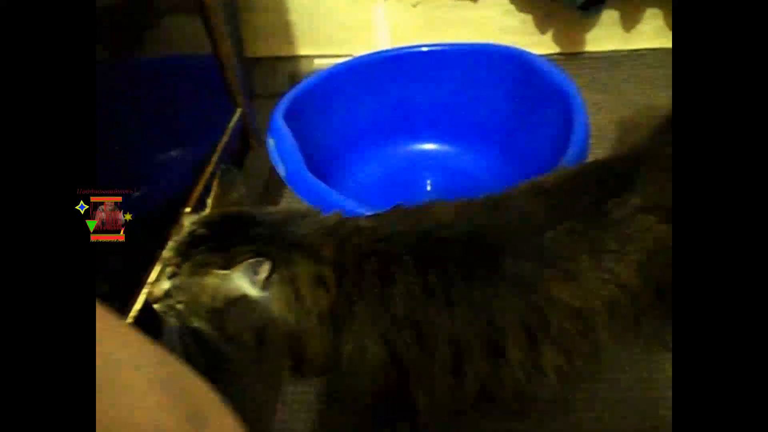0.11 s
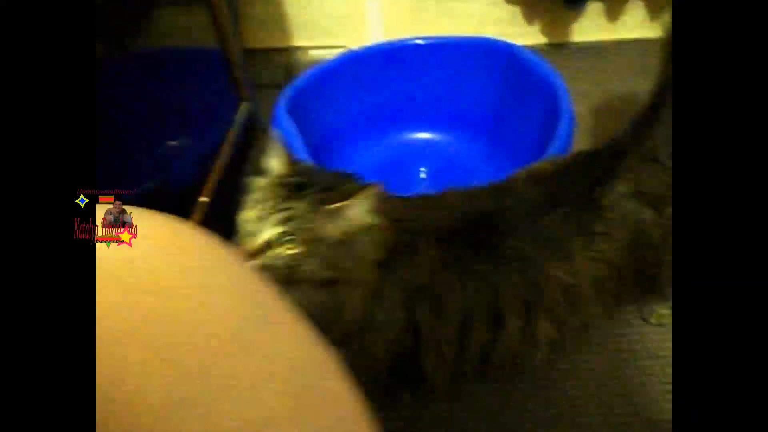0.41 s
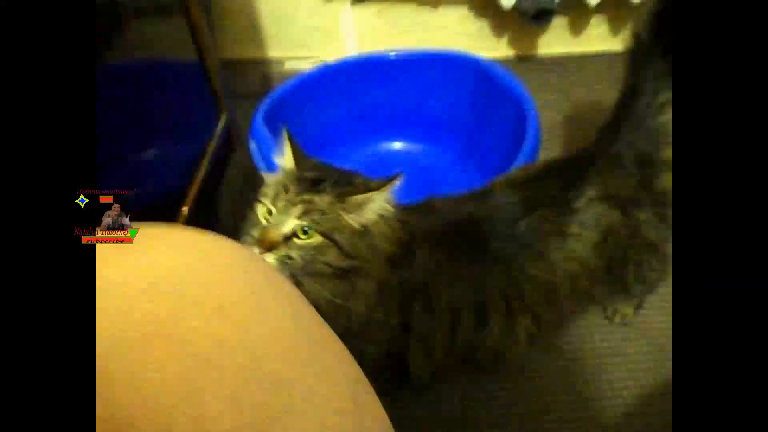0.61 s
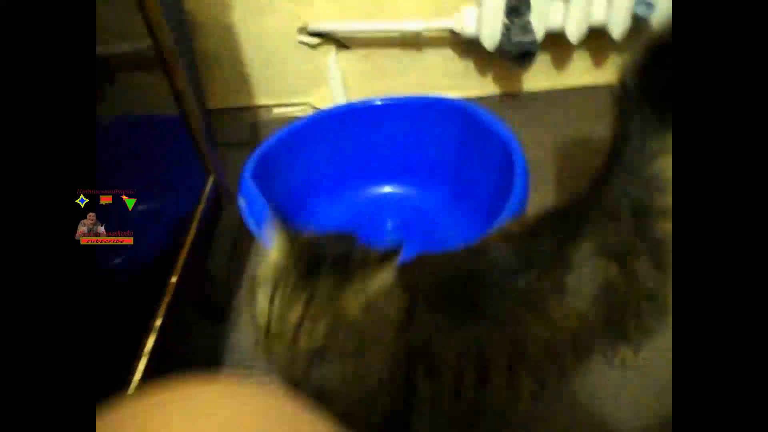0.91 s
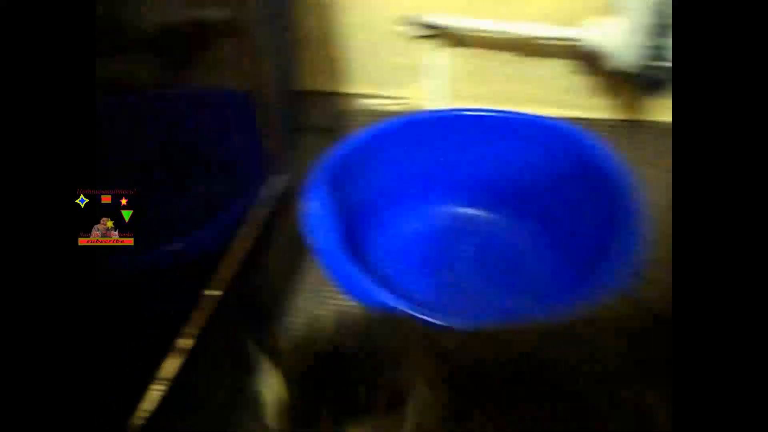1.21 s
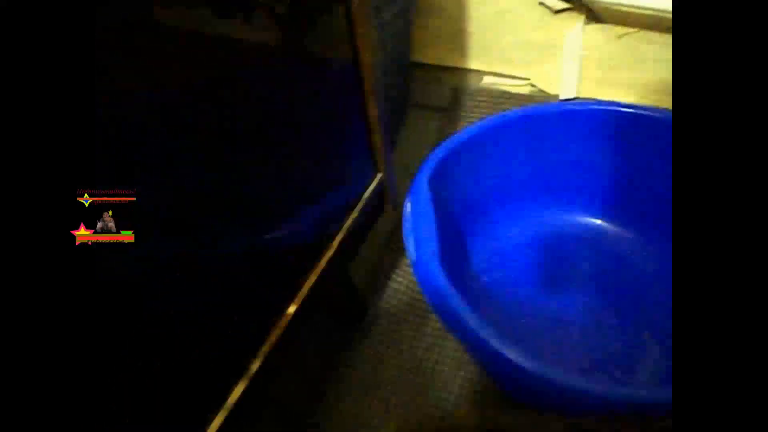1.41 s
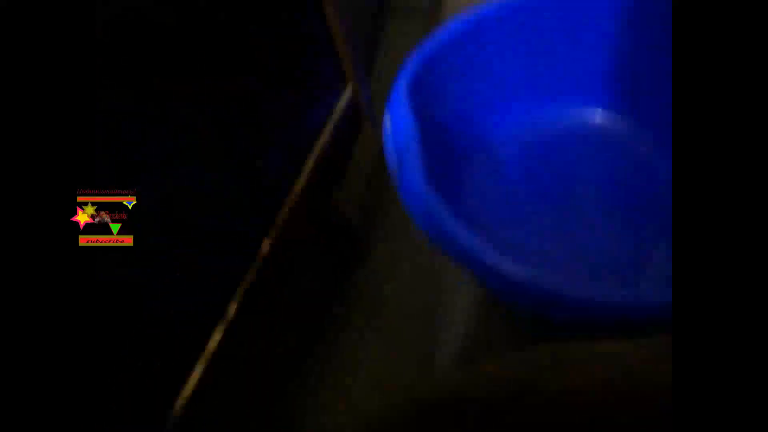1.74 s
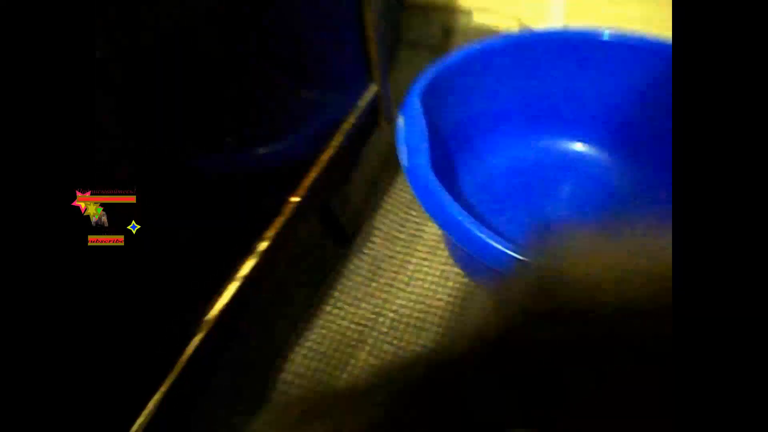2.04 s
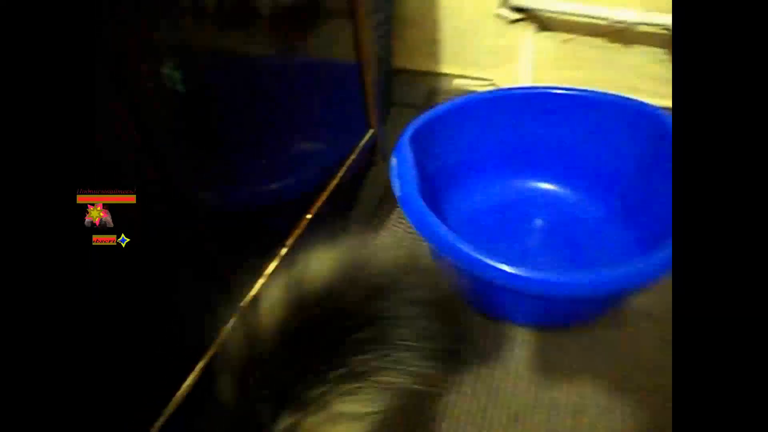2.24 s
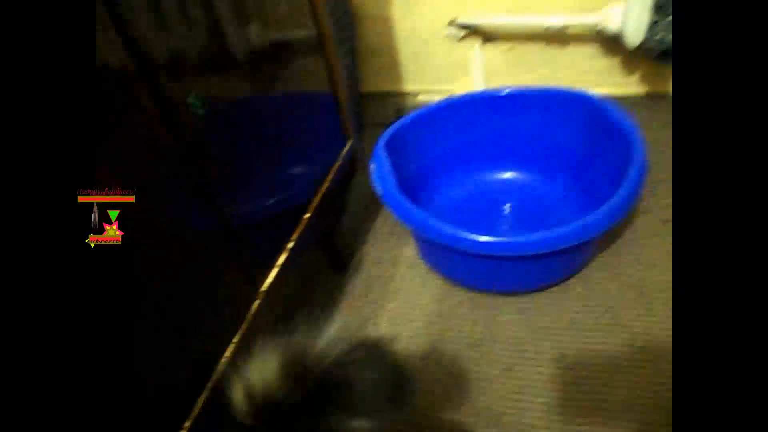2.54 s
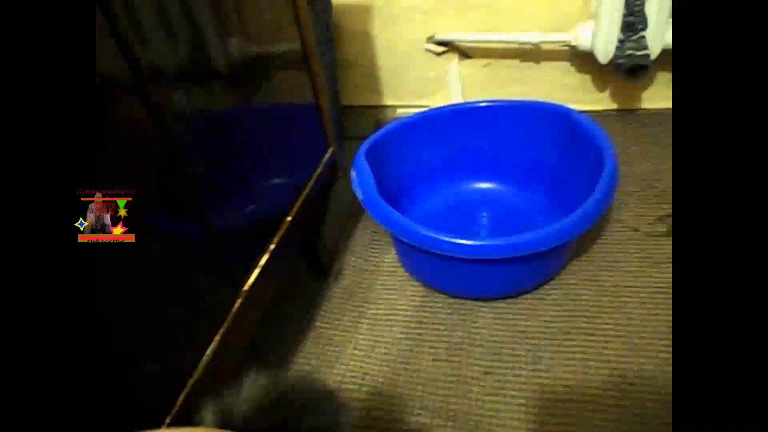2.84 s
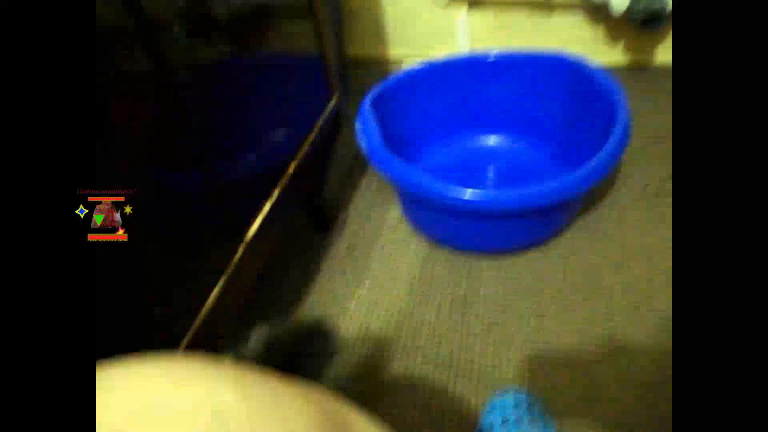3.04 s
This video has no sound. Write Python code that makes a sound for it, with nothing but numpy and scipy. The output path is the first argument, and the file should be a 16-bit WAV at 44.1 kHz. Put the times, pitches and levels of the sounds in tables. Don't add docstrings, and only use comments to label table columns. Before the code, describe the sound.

Slippers scuff on ribbed carpet in a small room; early sharp plastic clicks from the handheld camera, soft rubbing, one loud step, then a quick ratcheting scrape over ribs, close hissy microphone.

```python
import sys
import numpy as np
from scipy import signal
from scipy.fft import rfft, irfft
from scipy.io import wavfile
from scipy.ndimage import uniform_filter1d

SR = 44100
rng = np.random.default_rng(int(sys.argv[2]) if len(sys.argv) > 2 else 0)


def file_out(sig):
    cols = np.atleast_2d(sig).T
    lim = np.clip(cols, -1, 1)
    pcm = np.round(lim * 32767).astype(np.int16)
    wavfile.write(sys.argv[1], SR, pcm)


def decibels_to_gain(level_db):
    exponent = np.asarray(level_db, float) / 20
    return 10 ** exponent


N = 141120
T = np.arange(N) / SR

COARSE_RIBS = [2.742, 2.7685, 2.792, 2.814, 2.836, 2.8585, 2.882, 2.9105]
# offset_s, hiss_db, t60_s, sole_db, board_db
RIB_TOUCHES = [
    (-.007, -42.5, 0.06, -58, -46.5),
    (0, -43.5, 0.037, -55, -58),
    (.0085, -63, .02, -44.5, -45),
]


def rms_one(x):
    return x / np.sqrt(np.mean(x ** 2) + 1e-20)


def colour(x, points):
    hz, db = np.transpose(points)
    log_hz = np.log(np.maximum(np.arange(N // 2 + 1) * SR / N, 1))
    gain = decibels_to_gain(np.interp(log_hz, np.log(hz), db))
    return rms_one(irfft(rfft(x) * gain, N))


def ring(x, hz, width_hz):
    r = np.exp(-np.pi * width_hz / SR)
    zeros = [(1 - r * r) / 2, 0, (r * r - 1) / 2]
    poles = [1, -2 * r * np.cos(2 * np.pi * hz / SR), r * r]
    return signal.lfilter(zeros, poles, x + 1e-18)


def drift(rate_hz):
    r = np.exp(-2 * np.pi * rate_hz / SR)
    slow = signal.lfilter([1], [1, -2 * r, r * r], rng.standard_normal(N + SR))
    return rms_one(slow[SR:])


def stroke(s, length):
    rise_share, fall_share = 0.26, 0.47
    out = np.zeros(N)
    part = slice(max(int(s * SR), 0), int((s + length) * SR))
    u = (T[part] - s) / length
    ramp = np.clip(np.minimum(u / rise_share, (1 - u) / fall_share), 0, 1)
    out[part] = np.sin(np.pi / 2 * ramp) ** 2
    return out


def strike(s, rise, t60):
    out = np.zeros(N)
    part = slice(max(int((s - 10 * rise) * SR), 0), int((s + 2 * t60) * SR))
    since = T[part] - s
    out[part] = np.exp(np.where(since < 0, since / rise, -since * np.log(1000) / t60))
    return out


def background():
    # hz, level_db
    hiss_spectrum = [(180, -25), (300, 3.5), (654, -12.5), (950, -8.5), (1260, -12), (2420, -11.5),
                     (10100, -13.5), (10900, -21), (12400, -22), (16100, -80), (22000, -120)]
    rumble_spectrum = [(24, -21), (40, -1.5), (209, -19.5), (320, -24), (420, -46), (700, -120)]
    # time_s, level_db
    sway = [(0, -0.5), (2.0, -1), (2.9, -0.5), (2.96, -3), (3.2, -1.5)]
    hiss_gain = decibels_to_gain(-55.5 + np.interp(T, *np.transpose(sway)) + drift(13.0))
    hiss = hiss_gain * colour(rng.standard_normal(N), hiss_spectrum)
    rumble = decibels_to_gain(-54.5) * colour(rng.standard_normal(N), rumble_spectrum)
    return hiss + rumble


def circuit_whine():
    # pitch_hz, rms_db
    lines = [(10713, -74), (10794, -92), (11256, -106), (11337, -74.5)]
    return sum(np.sqrt(2) * decibels_to_gain(db) * np.sin(2 * np.pi * hz * T) for hz, db in lines)


def hand():
    # time_s, level_db
    motion = [(0.0, -54.5), (0.27, -46.5), (0.31, -24.5), (0.36, -69), (0.41, -27), (0.46, -43),
              (1.02, -49.5), (1.12, -36), (1.25, -38), (1.55, -31), (1.67, -36), (1.78, -33), (2.0, -46.5),
              (2.13, -31), (2.21, -47.5), (2.44, -45), (3.16, -44.5), (3.2, -60)]
    band = signal.butter(2, [4, 15.1], "band", fs=SR, output="sos")
    slow = signal.sosfilt(band, rng.standard_normal(N + SR))[SR:]
    even = slow / np.sqrt(uniform_filter1d(slow ** 2, size=6000) + 1e-12)
    return decibels_to_gain(np.interp(T, *np.transpose(motion))) * even


def casing():
    # start_s, peak_db, main_ring_hz, build_up_s, t60_s
    snaps = [(0.3002, -9.5, 3570, 0.0021, 0.0078), (0.391, -27, 2760, 0.00017, 0.013),
             (0.5037, -12, 2730, 0.00035, 0.0079), (0.5575, -17.5, 7640, 0.00021, 0.0037),
             (0.5969, -10, 5030, 0.00066, 0.0018), (0.6146, -14, 7300, 0.00021, 0.0029),
             (1.1108, -16, 6600, 0.00012, 0.0023), (.602, -30, 2800, 0.00056, 0.0053),
             (.606, -30, 2950, 0.00038, 0.0052), (2.349, -31.5, 2050, .0008, 0.0089)]
    # pitch_hz, level_db relative to the main ring
    snap_modes = [
        [(2110, -20), (2650, -9), (4500, -10), (5280, -9.5), (5890, -13.5), (7020, -13), (9190, -18.5)],
        [],
        [(1930, -17), (3370, -11.5), (4780, -2.5), (5750, -6.5), (6490, -11), (7660, -8.5)],
        [(3030, -7), (4410, -13), (5880, -11), (9990, 0)],
        [(856, -21.5), (2720, -14.5), (8000, -15), (10300, -14)],
        [(3000, -6.5), (3870, -7.5), (6040, 1.5), (8870, -9), (10300, -9)],
        [(7700, -6), (3280, -17)],
        [],
        [(7300, -6)],
        [(2700, -4), (3600, -2)],
    ]
    # start_s, level_db, pitch_hz, t60_s
    knocks = [(.301, -24, 30, .1), (.302, -25, 608, .022), (.3012, -31, 1000, .012), (.6, -31, 40, .15),
              (.392, -30, 20, .2), (.5045, -29, 947, .03), (.5046, -31, 1227, .022)]
    out = np.zeros(N)
    crackle_spectrum = [(500, -3), (1200, 0.0), (2500, 5.5), (9000, 1.5), (12000, -9.5)]
    crackle = colour(rng.standard_normal(N), crackle_spectrum)
    for (s, db, hz, rise, t60), modes in zip(snaps, snap_modes):
        tones = 0
        for mode_hz, mode_db in [(hz, 0), *modes]:
            tones = tones + decibels_to_gain(mode_db) * np.sin(2 * np.pi * (mode_hz * (T - s) + rng.random()))
        first = int(s * SR) - 20
        local_spread = crackle[first:first + 80].std()
        out += decibels_to_gain(db) * strike(s, rise, t60) * (tones + decibels_to_gain(-7.5) * crackle / local_spread)
    for s, db, hz, t60 in knocks:
        out += decibels_to_gain(db) * strike(s, 0.0016, t60) * np.sin(2 * np.pi * hz * (T - s))
    return out


def board_hums():
    # start_s, length_s, level_db, start_hz, end_hz
    hum_events = [(0.67, 0.072, -47.5, 169.7, 171), (1.364, 0.1, -35.5, 104.7, 107),
                  (1.436, 0.054, -31.5, 88.2, 80), (1.506, 0.056, -34, 92.8, 88),
                  (1.497, 0.46, -40, 104, 93.6), (2.271, 0.035, -37.5, 107, 100),
                  (2.458, 0.123, -39, 183.5, 120), (2.521, 0.1, -43, 230, 219)]
    bounce_hz = 13.9
    wobble = 1 + 0.052 * drift(22.0)
    out = 0
    for s, length, db, hz, end_hz in hum_events:
        pitch = np.interp(T, [s, s + length], [hz, end_hz]) * wobble
        tone = np.sin(2 * np.pi * np.cumsum(pitch) / SR)
        if length > 0.2:
            tone = tone * np.abs(np.sin(np.pi * bounce_hz * (T - s)))
        out = out + decibels_to_gain(db) * stroke(s, length) * tone
    return np.sqrt(2) * out


def squeaks():
    # start_s, length_s, level_db, start_hz, end_hz
    squeak_events = [
        (2.127, 0.0323, -52.5, 1493, 1310),
        (2.153, 0.029, -46, 1259, 986),
    ]
    out = 0
    for s, length, db, hz, end_hz in squeak_events:
        pitch = np.interp(T, [s, s + length], [hz, end_hz]) * (1 + 0.0197 * drift(63))
        phase = 2 * np.pi * np.cumsum(pitch) / SR
        gain = decibels_to_gain(db + 2 * drift(80)) * stroke(s, length) ** 0.5
        out = out + gain * (np.sin(phase) + np.sin(2 * phase))
    return out


def rib_gain():
    # start_s, end_s, start_ribs_per_s, end_ribs_per_s, depth_db
    rides = [
        (2.31, 2.378, 190, 220, 0),
        (2.47, 2.567, 148, 120, 5),
    ]
    catch_share = 0.64
    gain_db = np.zeros(N)
    for s, end, rate, end_rate, depth_db in rides:
        part = slice(int(s * SR), int(end * SR))
        u = T[part] - s
        ribs_passed = u * rate + (end_rate - rate) * u * u / (2 * (end - s))
        slid = np.clip((ribs_passed % 1 - catch_share) / (1 - catch_share), 0, 1)
        gain_db[part] = depth_db * (0.3 - slid ** 0.5)
    return decibels_to_gain(gain_db)


def creak():
    # start_s, end_s, start_slips_per_s, end_slips_per_s, regular_share
    regular = [
        (1.03, 1.107, 243, 246, 0.32),
        (1.1, 1.21, 236, 232, 0.78),
        (2.288, 2.4, 160, 150, 0.52),
        (2.44, 2.492, 150, 170, 0.86),
    ]
    # start_s, length_s, level_db, pitch_hz, width_hz
    sole_modes = [(1.039, 0.045, -41, 1190, 150), (1.043, 0.089, -50, 976, 100),
                  (1.071, 0.13, -46, 1140, 197), (1.217, 0.027, -45, 2220, 700),
                  (2.159, 0.067, -52, 2070, 900), (2.297, .05, -49.5, 2880, 200),
                  (2.284, 0.092, -45.5, 1200, 250), (2.302, 0.036, -44, 2100, 220),
                  (2.303, 0.069, -51, 3560, 250), (2.44, 0.32, -45.5, 7100, 500),
                  (2.69, 0.22, -53.5, 1180, 100), (2.457, 0.048, -51.5, 2050, 300),
                  (2.55, 0.12, -50.5, 1150, 198)]
    slips = rng.standard_normal(N) * decibels_to_gain(2 * drift(51)) * rib_gain() ** 2
    for s, end, rate, end_rate, share in regular:
        part = slice(int(s * SR), int(end * SR))
        turns = np.cumsum(np.interp(T[part], [s, end], [rate, end_rate])) / SR
        pulses = rms_one(np.diff(np.floor(turns), prepend=0))
        slips[part] = np.sqrt(1 - share) * slips[part] + np.sqrt(share) * pulses
    white = rms_one(rng.standard_normal(N))
    out = 0
    for s, length, db, hz, width_hz in sole_modes:
        tone = ring(slips, hz, width_hz) / ring(white, hz, width_hz).std()
        out = out + decibels_to_gain(db) * stroke(s, length) ** 0.5 * tone
    return out


def tread_pings():
    moments = [s + lag for s in COARSE_RIBS for lag, *_ in RIB_TOUCHES]
    gains = decibels_to_gain(-50.5 + rng.normal(0, 1.5, len(moments)))
    envelope = sum(gain * strike(s, 0.0004, 0.03) for s, gain in zip(moments, gains))
    return np.sin(2 * np.pi * 7100 * T) * envelope


def tread_knocks():
    # pitch_hz, width_hz, first_db, main_db, last_db (level at each contact)
    tread_modes = [
        (556, 380, -43, -47.5, -58),
        (1180, 200, -45, -52, -57),
        (2100, 520, -57, -59, -66),
        (3800, 1580, -55, -46, -64),
        (6620, 1260, -49, -36.5, -56),
        (9070, 2600, -56, -49, -55),
    ]
    lag_s_per_khz = 0.00056
    out = 0
    for hz, width_hz, *dbs in tread_modes:
        clicks = np.zeros(N)
        for (lag, *_), db in zip(RIB_TOUCHES, dbs):
            late = lag - 1 / (np.pi * width_hz)
            if lag < -0.002:
                late += lag_s_per_khz * hz / 1000
            at = ((np.array(COARSE_RIBS) + late) * SR).astype(int)
            clicks[at] = decibels_to_gain(db + rng.normal(0, 1, len(COARSE_RIBS)))
        knock = ring(ring(clicks, hz, width_hz), hz, width_hz)
        out = out + knock * np.e * SR / (np.pi * width_hz)
    return out


def fibre_rub():
    fibres_per_s, grain_share, same_share = 2600, 0.39, 0.7
    hits = rng.random(N) < fibres_per_s / SR
    force = rng.standard_normal(N) * decibels_to_gain(0.82 * rng.exponential(1, N).clip(0, 4))
    grains = rms_one(hits * force)
    rub = np.sqrt(grain_share) * grains + np.sqrt(1 - grain_share) * rng.standard_normal(N)
    at = ((np.array(COARSE_RIBS) - 0.01) * SR).astype(int)
    span = np.arange(SR // 45)
    places = at[:, None] + span
    rub[places] = np.sqrt(same_share) * rub[span] + np.sqrt(1 - same_share) * rub[places]
    return rub


def shuffle():
    # start_s, length_s, hiss_db, sole_db, board_db
    strokes = [(.0, 0.083, -78, -62.5, -58), (0.218, 0.23, -68, -55, -53), (0.264, 0.021, -51.5, -62, -63),
               (0.293, 0.25, -57.5, -57, -66), (0.561, 0.13, -47, -46, -55), (0.645, 0.082, -48, -52, -45),
               (0.786, 0.23, -49, -57, -57), (0.843, 0.045, -54.5, -42, -34.5),
               (0.909, 0.039, -45, -59, -51), (0.991, 0.2, -46, -52.5, -53),
               (1.105, 0.29, -54.5, -53.5, -47.5), (1.213, 0.018, -50, -45, -40),
               (1.319, 0.073, -47, -44.5, -42.5), (1.37, 0.17, -52.5, -53.5, -43),
               (1.444, 0.15, -43.5, -46, -52), (1.496, 0.47, -45, -45, -45),
               (1.964, 0.1, -56.5, -62, -52.5), (2.123, 0.1, -52.5, -47, -43),
               (2.193, 0.021, -47, -47, -57), (2.302, 0.056, -35.5, -43.5, -46),
               (2.421, 0.28, -42, -44.5, -47.5), (2.653, 0.15, -43.5, -63, -51),
               (2.715, 0.29, -59, -50, -50.5), (2.903, 0.44, -92, -59.5, -66.5),
               (3.072, 0.04, -54.5, -83, -73)]
    # start_s, hiss_db, t60_s, sole_db, board_db
    touches = [(.037, -35, 0.057, -45.5, -63), (.212, -36, 0.07, -37.5, -52), (0.39, -52, 0.11, -39.5, -53),
               (0.605, -34, 0.049, -54, -58), (1.341, -37, 0.032, -56, -53), (1.442, -33, 0.05, -34.5, -29),
               (2.054, -15, 0.033, -33.5, -29.5), (2.061, -34, 0.14, -42.5, -35),
               (2.149, -42, 0.048, -48, -57), (2.156, -37, 0.044, -38.5, -45), (1.219, -47, .03, -50, -55),
               (2.273, -41.5, 0.15, -41.5, -48), (2.435, -43, 0.033, -47.5, -44),
               (2.443, -36, 0.035, -45, -43), (2.695, -37, 0.061, -36.5, -51)]
    # hz, level_db
    fibre_spectrum = [(880, -45), (1500, -19), (1890, -7), (2400, -11.5), (3000, -7), (5430, -6.5),
                      (7080, -2), (10300, -12.5), (12500, -32), (16200, -70.5), (22000, -120)]
    sole_spectrum = [(180, -10.5), (300, -1), (887, -3.5), (972, -7.5), (1070, -2), (1510, -13.5),
                     (2200, -24), (2860, -17), (4840, -120)]
    board_spectrum = [(35, -11), (60, -2.5), (108, -5), (162, -7), (231, -5), (450, -18.5), (580, -51),
                      (990, -120)]
    power = np.zeros((3, N))
    for s, length, *dbs in strokes:
        power += (decibels_to_gain(dbs)[:, None] * stroke(s, length)) ** 2
    memory = np.exp(-1 / (0.0098 * SR))
    power = np.maximum(power, signal.lfilter([1 - memory], [1, -memory], power + 1e-18))
    power[:2] *= rib_gain() ** 2
    contacts = [(s + lag, *rest) for s in COARSE_RIBS for lag, *rest in RIB_TOUCHES]
    for s, hiss_db, t60, sole_db, board_db in touches + contacts:
        for k, (db, slower) in enumerate([(hiss_db, 1), (sole_db, 1.3), (board_db, 2.5)]):
            power[k] += (decibels_to_gain(db) * strike(s, 0.00045 * slower ** 2, t60 * slower)) ** 2
    rub = fibre_rub()
    layers = [colour(rub, fibre_spectrum), colour(rub, sole_spectrum),
              colour(rng.standard_normal(N), board_spectrum)]
    return sum(np.sqrt(p) * x * decibels_to_gain(1.5 * drift(36)) for p, x in zip(power, layers))


def scene():
    around = background() + circuit_whine() + hand()
    camera_and_boards = casing() + board_hums()
    slippers = squeaks() + creak() + tread_pings() + tread_knocks() + shuffle()
    return (around + camera_and_boards + slippers)[None]


def starve(x):
    # centre_s, share of bands kept (0-1)
    thinned = [(.127, .35), (.15, .35), (.342, .45), (.684, .65), (1.52, .4), (1.845, .55), (2.472, .55),
               (2.751, .6)]
    out, size = x.copy(), 2048
    window = signal.windows.kaiser_bessel_derived(size, 4 * np.pi) ** 2
    treble = np.arange(size // 2 + 1) * SR / size > 1100
    for s, share in thinned:
        part = slice(int(s * SR) - size // 2, int(s * SR) + size // 2)
        lines = rfft(x[part] * window)
        bands = abs(lines[:-1]).reshape(-1, 16).mean(axis=1)
        stands_out = bands / uniform_filter1d(bands, size=9)
        strong = stands_out > np.quantile(stands_out, 1 - share)
        loud = np.append(np.repeat(strong, 16), False)
        kept = loud & (abs(lines) > uniform_filter1d(abs(lines), size=20))
        out[part] -= irfft(lines * (~kept & treble), size)
    return out


def band_limit(x):
    return signal.sosfilt(signal.butter(12, 12870, fs=SR, output="sos"), x)


def record(dry):
    low_pass = signal.cheby2(8, 50, 13300, fs=SR, output="sos")
    cut = signal.sosfilt(low_pass, dry)
    return band_limit(starve(cut[0])[None])


dry = scene()
out = record(dry)
file_out(out)
```